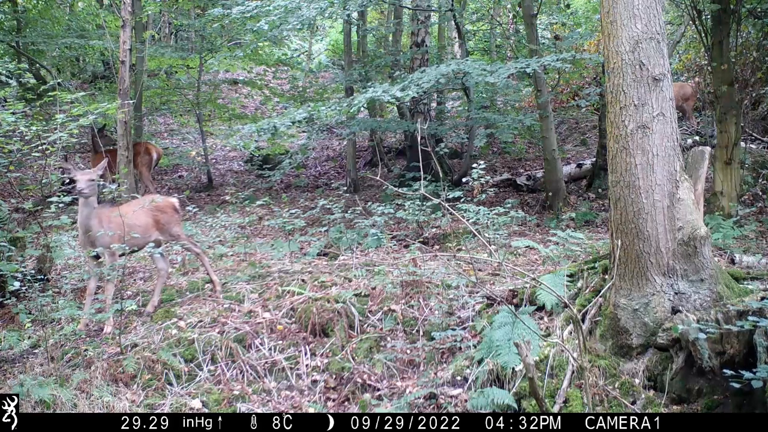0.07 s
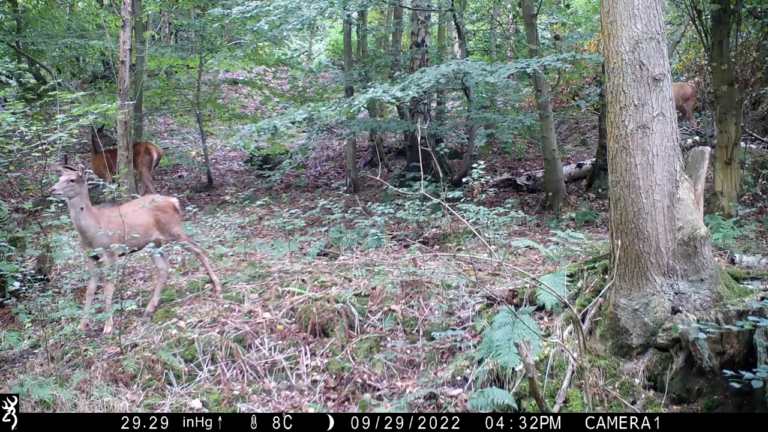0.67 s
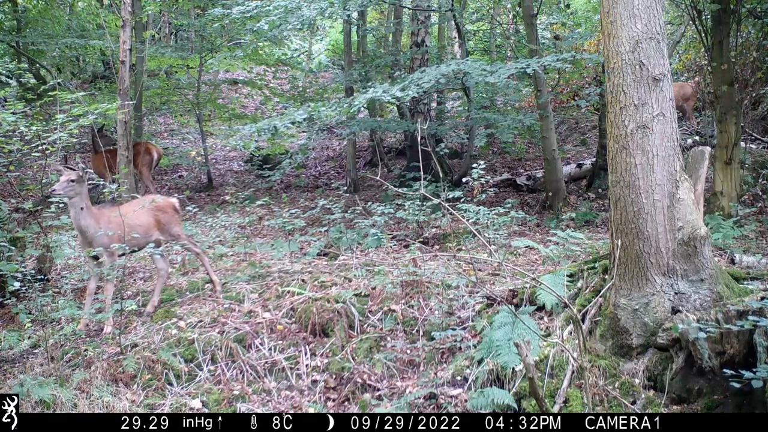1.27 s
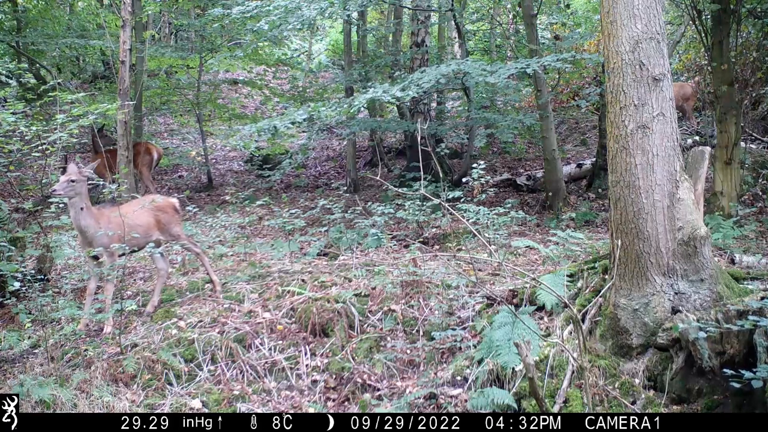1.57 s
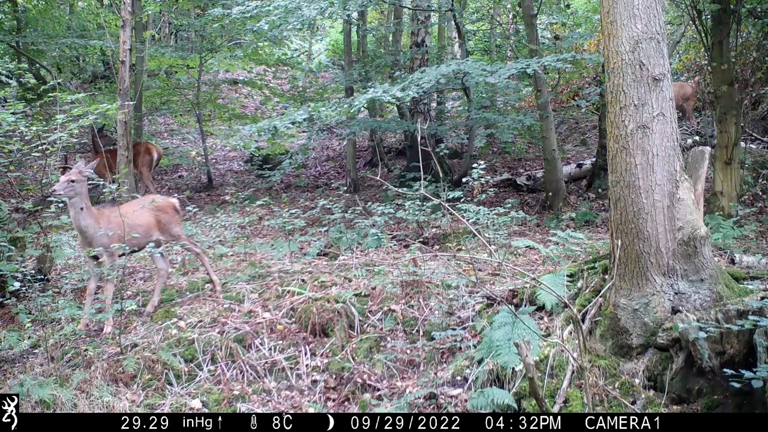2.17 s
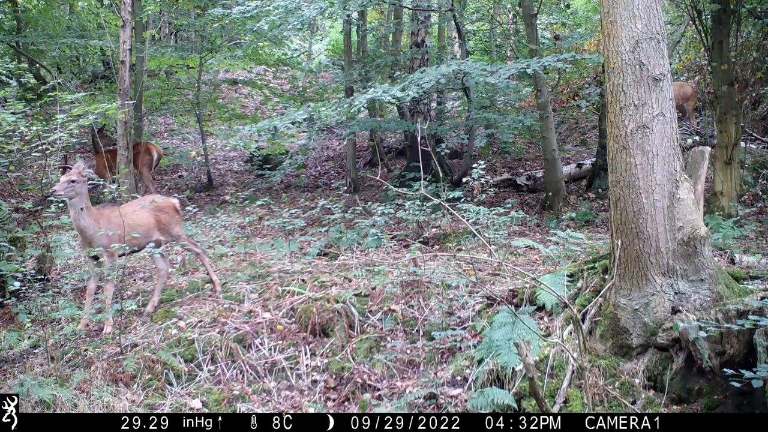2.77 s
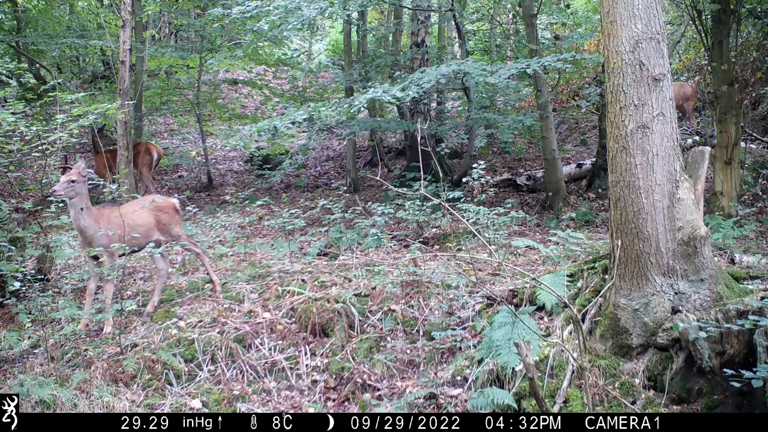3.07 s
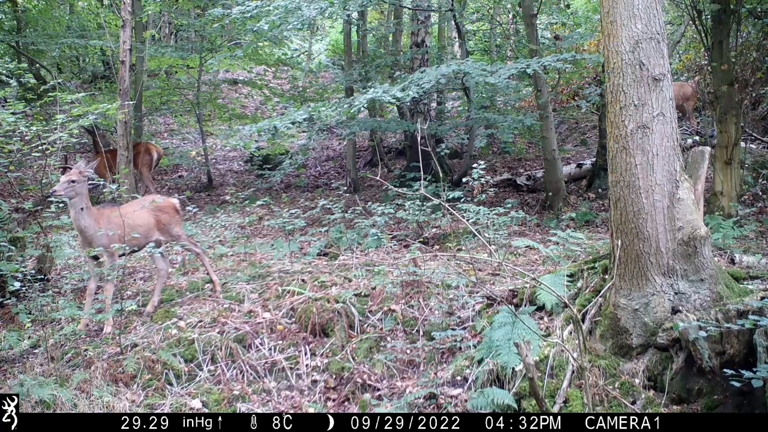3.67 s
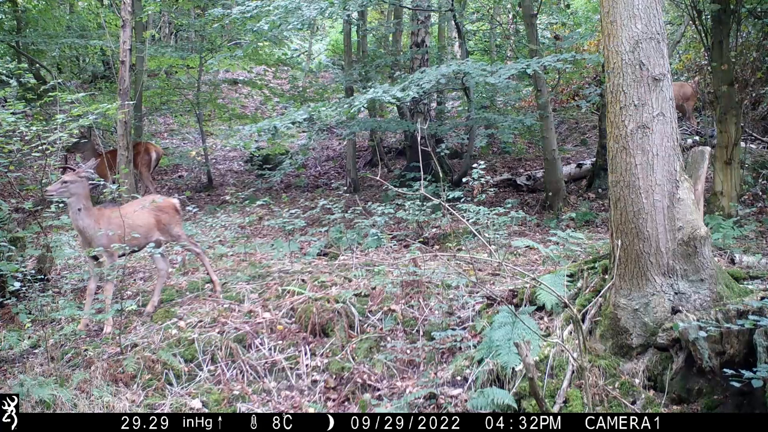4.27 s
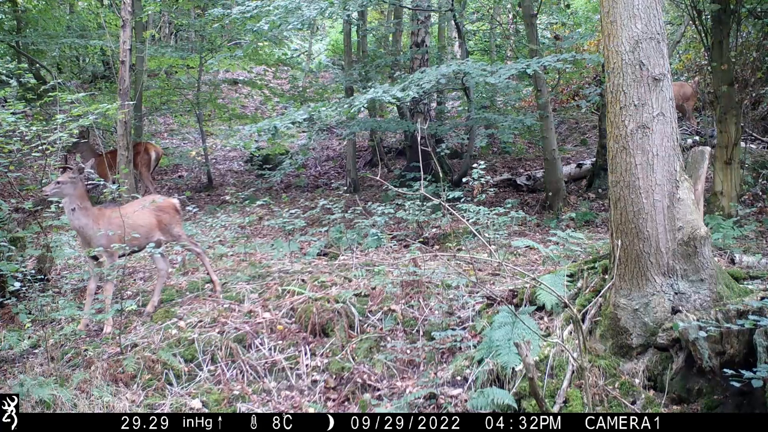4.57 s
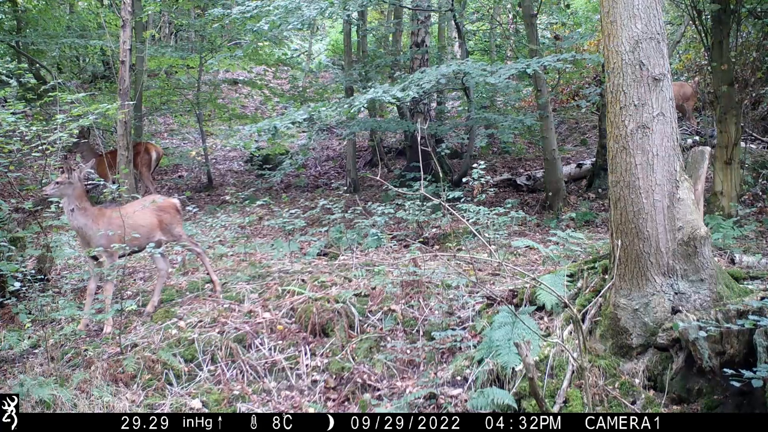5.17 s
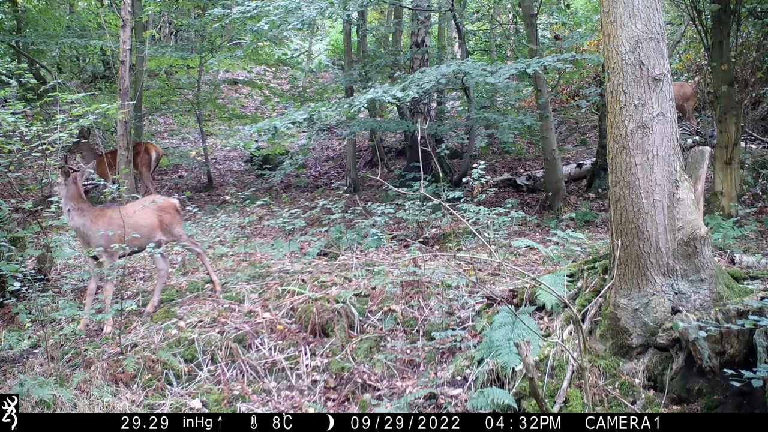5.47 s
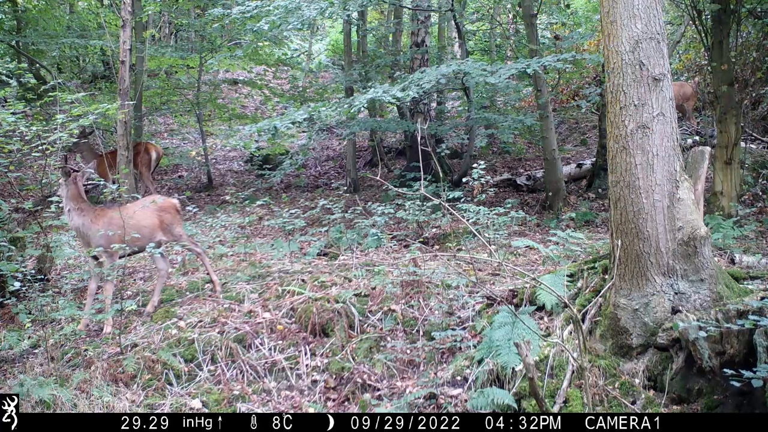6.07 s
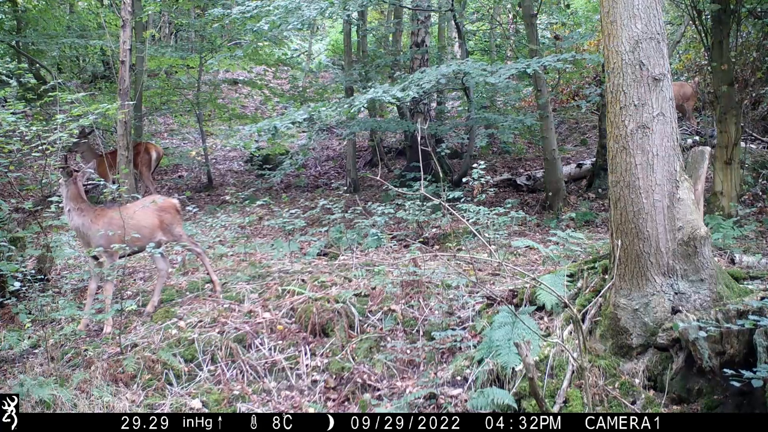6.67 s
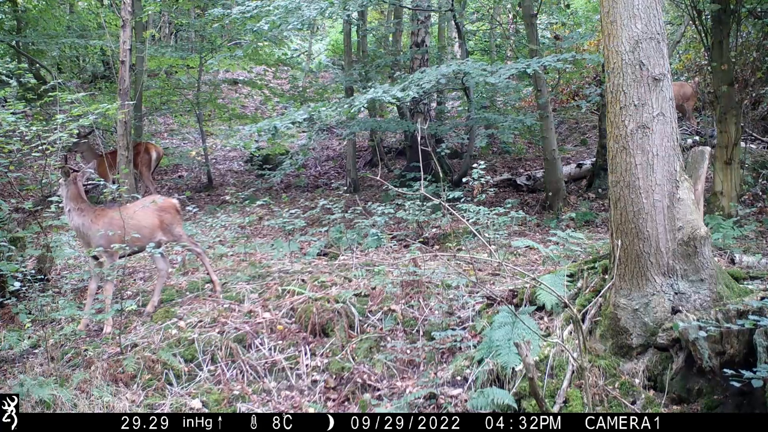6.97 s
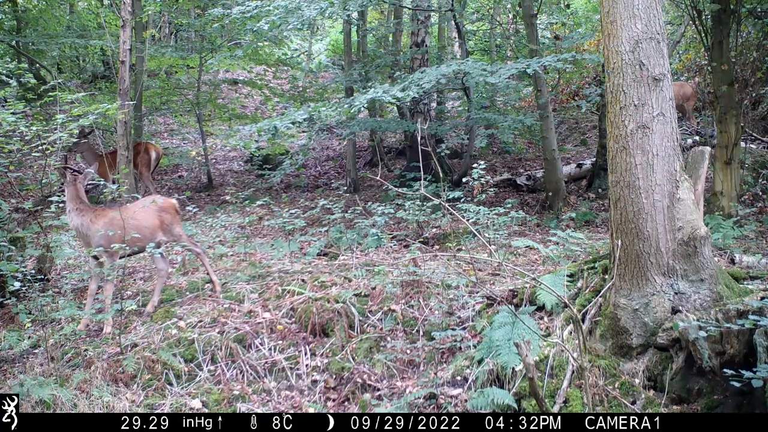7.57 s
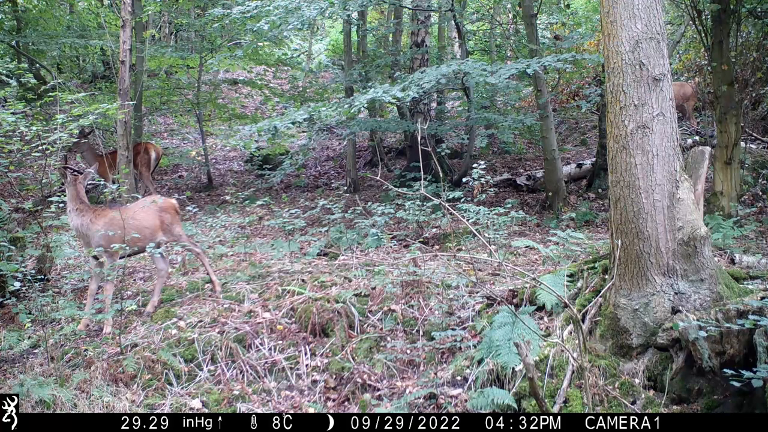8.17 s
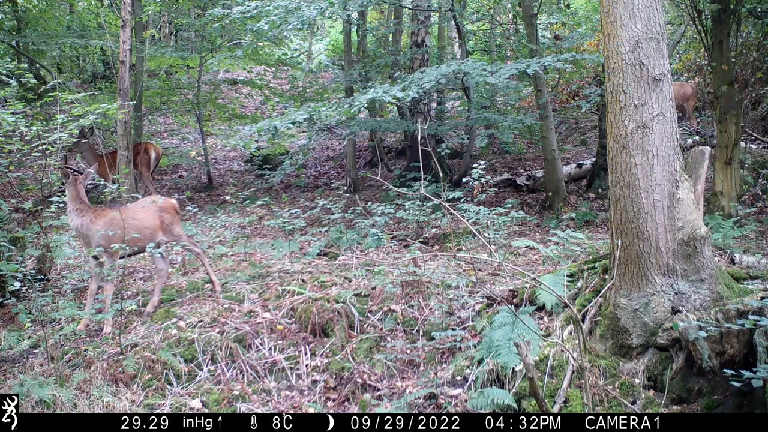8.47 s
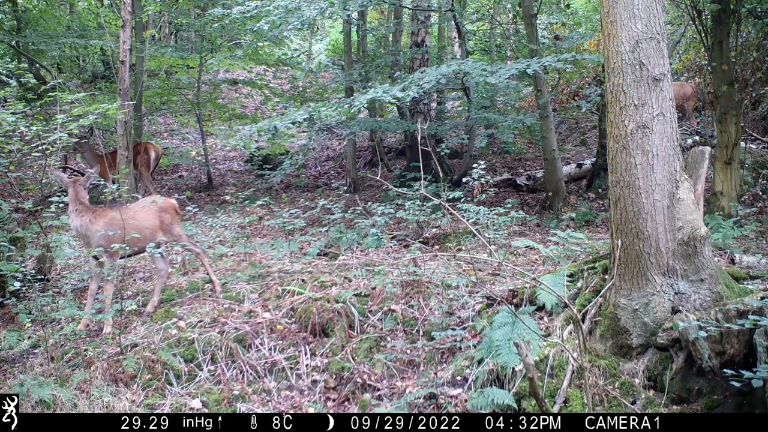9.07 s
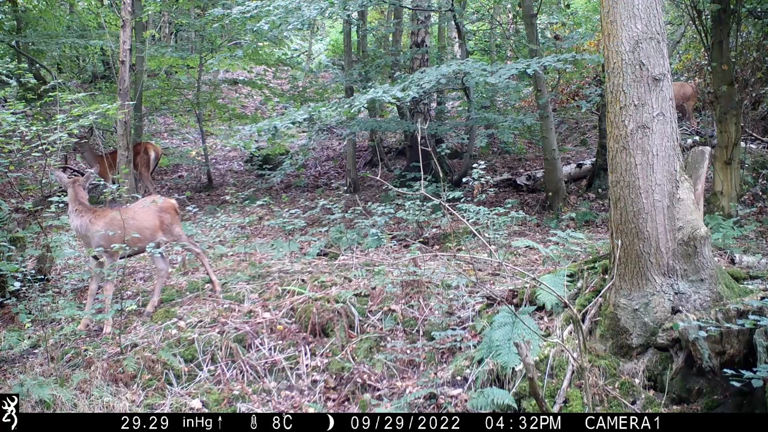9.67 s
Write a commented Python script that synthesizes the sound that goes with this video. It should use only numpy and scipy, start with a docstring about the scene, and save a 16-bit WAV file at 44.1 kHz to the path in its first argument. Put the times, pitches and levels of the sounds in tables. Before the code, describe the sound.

In a quiet wood, a few twigs snap faintly under hooves. Then a red deer stag roars loudly close by: a long bellow that climbs into a harsh rasp, holds a steadier note and sinks away. A shorter roar follows at once, swooping up from a moan into a rough rattle. The trees add a light echo, and the slightly dull microphone carries a steady soft hiss.

```python
"""In a quiet wood, a red deer stag roars twice close by, over a hiss and a soft, growing murmur.
Source and filter make the voice: the vocal folds release puffs of air and the throat resonates.
Each roar starts as a clear moan; the larynx drops, the longer throat resonates lower, and the
folds break into a harsh rattle. Twigs snap under hooves beforehand, foliage and trunks scatter
the sound, and a narrow-band microphone channel clips on the loudest stretches."""
import sys
import numpy as np
from scipy import signal
from scipy.fft import rfft, irfft, next_fast_len
from scipy.io import wavfile
from scipy.ndimage import uniform_filter1d, map_coordinates

SR = 44100
rng = np.random.default_rng(int(sys.argv[2]) if len(sys.argv) > 2 else 0)


def int16_out(signal):
    """Quantize to a 16-bit WAV file."""
    q = np.round(np.clip(np.atleast_2d(signal).T, -1, 1) * 32767)
    wavfile.write(sys.argv[1], SR, q.astype(np.int16))


N = 437913

# Spectra of the steady hiss and the midrange murmur. Each row: frequency in Hz, relative level in dB.
HISS_SPECTRUM = [(12, -35.5), (20, -6.5), (108, -1.5), (157, -5), (327, -8), (417, -11), (446, -12),
                 (476, -9), (569, -12.5), (990, -13.5), (1510, -18.5), (2870, -20), (4000, -23.5),
                 (5200, -59), (8800, -120)]
MURMUR_SPECTRUM = [(150, -36), (250, -13), (352, -6.5), (420, -5.5), (481, -7.5), (563, -3), (611, -4),
                   (1110, -1.5), (3000, -26.5), (3900, -65.5), (6600, -120)]
# The murmur grows louder and stays after the roars. Each row: time in seconds, level in dB.
MURMUR_LEVEL = [(0, -55), (2.9, -58), (6.9, -47), (9.2, -47), (9.9, -47)]
# Near and far echoes. Each row: frequency in Hz, 60 dB decay time in seconds, relative level in dB.
FOLIAGE_DECAY = [(500, 0.23, -6.5), (1200, 0.32, -9.5), (2270, 0.43, 0.5), (4100, 0.33, -7.5)]
TRUNK_DECAY = [(150, 0.34, -0.5), (410, 1.52, 8.5), (670, 0.45, -2), (1200, 1.1, -0.5), (4070, 0.49, -8.5)]
# Twigs and dry leaves under hooves. Each row: start in seconds, relative peak level in dB.
SNAPS = [(0.148, -33), (0.179, -38), (0.77, -38), (0.864, -35), (0.95, -21.5), (2.22, -30.5)]
# Resonances of a stick, then of the throat with the larynx high, halfway and dropped.
# Each row: nominal frequency in Hz, width in Hz, relative level in dB.
TWIG_MODES = [(850, 230, -4), (1460, 470, -7), (2300, 340, -17), (3160, 300, -8)]
MOAN_MODES = [(527, 22, -14), (631.5, 20, -5), (1001.6, 44, 5.5), (1407, 40, -11), (1410, 37, -13),
              (1672, 14, -10), (1980, 13, 1), (2290, 200, -18.5), (2620, 220, -21.5), (3130, 150, -32),
              (3350, 180, -14.5)]
GROAN_MODES = [(320, 40, 3), (520, 52, -10.5), (665, 180, -9), (805, 110, -13.5), (940, 290, -3.5),
               (1100, 43, -2), (1252, 56, 11), (1490, 90, -5), (1720, 40, -10), (2000, 28, -13),
               (2316, 17, -5), (2626, 76, -10), (2920, 100, -21), (3394, 270, -8)]
ROAR_MODES = [(208, 40, -4.5), (357, 28, 2), (490.8, 21, 6), (670, 90, -18.5), (837.6, 25.7, 5),
              (926, 290, -9.5), (1065, 33, 4.5), (1198, 44.3, 4), (1390, 120, -31.5), (1487, 115, -7),
              (1719, 27, -4.5), (2014, 28, -11), (2115, 93, -13), (2396, 42, -12), (2653, 130, -15),
              (3040, 75, -14.5), (3357, 75, -12), (3690, 710, -18)]
# Factor on the resonance frequencies once the throat has settled in each of those three positions.
REST_TUNING = [.96, 0.98, 1]
# Neck stretches raise the resonances, then let them sink. Each row: time in seconds, added factor.
STRETCHES = [(3.0, 0.18), (3.26, 0.14), (7.1, 0.15), (7.67, 0.039)]
# The two roars. Each row: start in seconds, end in seconds.
ROARS = [(3.0, 6.69), (7.115, 8.7)]
# Vocal effort through each roar. Each row: time in seconds, relative level in dB.
FIRST_EFFORT = [(3.0, -39), (3.04, -25.5), (3.15, -10.5), (3.2, -17.5), (3.33, -9.5), (4.08, -9.5),
                (4.16, -12.5), (4.53, -12.5), (5.18, -18), (5.24, -17), (6.11, -15), (6.19, -19),
                (6.57, -20), (6.62, -33)]
SECOND_EFFORT = [(7.11, -45.5), (7.152, -25), (7.212, -14), (7.324, -11.5), (7.356, -9), (7.438, -10),
                 (7.528, -17.5), (7.71, -10), (7.856, -12), (8.438, -15), (8.546, -22), (8.66, -41.5)]
# Pitch of the folds: the first roar climbs, arches, eases, holds and sinks; the second swoops up,
# then arches lower. Each row: time in seconds, nominal frequency in Hz.
CLIMB = [(3.02, 117), (3.124, 148.8), (3.178, 156.4), (3.236, 155.8), (3.302, 189.8), (3.35, 192.1)]
ARCH = [(3.39, 209.3), (3.552, 239.8), (4.07, 240.9), (4.298, 218.2), (4.44, 218.1)]
EASE = [(4.5, 200.3), (4.828, 191.3), (4.87, 192.2)]
HOLD = [(4.9, 169.94), (6.03, 169.94)]
SINK = [(6.06, 166.1), (6.116, 162.7), (6.412, 154.4), (6.522, 145), (6.59, 132.5)]
SWOOP = [(7.12, 109.0), (7.15, 141.9), (7.178, 159.9), (7.226, 170.8), (7.27, 171.4), (7.39, 160.9),
         (7.54, 159.2), (7.68, 165.1)]
LOW_ARCH = [(7.71, 181.8), (8.022, 197.8), (8.132, 195.6), (8.432, 167), (8.48, 167.1)]
# Brief cracks in the held note. Each row: centre in seconds, length in seconds, depth from 0 to 1.
CRACKS = [(5.242, 0.03544, 1), (5.331, .028, .9), (5.443, 0.032, .4), (5.524, .028, 0.99),
          (5.592, .026, 0.97), (5.652, 0.0471, .9), (5.941, .03, 1), (6.029, .038, .85)]
# Boundaries in Hz between the five bands of the voice: fundamental, chest, low throat, mouth, rasp.
BAND_EDGES = [280, 430, 740, 1900]
# Ways of voicing, by name. Each row: relative levels of those five bands in dB.
VOICE_BANDS = {"muffled": (-10, -11, -5, -2.5, -21), "bleat": (-27.5, -22.5, -1.5, -2.5, -16),
               "moan": (-30, -25, -6, -.5, -16.5), "groan": (-16, -11, -9, -1.5, -10.5),
               "held": (-17.5, -15.5, -2.5, -5, -15.5), "booming": (-6, -11, -15.5, -2.5, -19),
               "growl": (-4, -10.5, -13, -4.5, -19), "hoarse": (-8, -11, -9, -2.5, -15.5),
               "cracked": (-10.5, -5, -9, -1.5, -9.5), "rattle": (-8, -7, -7.5, -3.5, -17),
               "harsh": (-17.5, -9.5, -7.5, -1, -16.5)}
# Disorder of the folds. Each entry: name of the voicing, roughness from 0 to 1.
ROUGHNESS = {"muffled": .12, "bleat": .09, "moan": .03, "groan": .04, "held": .045, "booming": .055,
             "growl": .52, "hoarse": .42, "cracked": .48, "rattle": .69, "harsh": .84}
# Passages between voicings. Each row: midpoint in seconds, glide in seconds, voicing, larynx drop
# (0 high, 1 halfway, 2 or more at the breastbone), extra rasp in dB.
PHASES = [(2.99, .02, "muffled", 0.17, -5.5), (3.11, .05, "bleat", 0.056, -1),
          (3.19, .03, "muffled", 0.25, 1), (3.26, .05, "hoarse", 1.9, 2), (3.43, .07, "harsh", 2, 0),
          (4.22, .2, "harsh", 2, -2), (4.47, .08, "booming", 2, 0), (4.725, 0.044, "growl", 2, -1),
          (4.895, .04, "groan", 2, -5), (5.07, .15, "held", 2, 0), (6.12, .12, "groan", 2, -1),
          (6.28, .15, "groan", 1.46, 1), (6.535, .04, "bleat", 3, 4.5), (7.0, .02, "muffled", 0.33, 7.5),
          (7.165, .05, "bleat", 0.069, 5), (7.26, .1, "moan", 0, -2.5), (7.49, .08, "groan", 0.51, 1),
          (7.63, .1, "groan", 1.6, 2), (7.695, .03, "hoarse", 2, -0.5), (7.87, .08, "rattle", 1.8, 1),
          (8.2, .2, "rattle", 2, -4.5), (8.5, 0.053, "harsh", 2, 1)]
# Response of the microphone channel. Each row: frequency in Hz, gain in dB.
MICROPHONE = [(3700, -0.5), (4000, -11), (4250, -2), (4420, -11), (4620, -52.5), (4900, -100)]


def amp(db):
    """Amplitude ratio of a level in decibels."""
    return 10 ** (np.asarray(db) / 20)


def unit(x):
    """Normalisation to an rms of 1."""
    return x / np.sqrt(np.mean(x ** 2) + 1e-20)


def curves(rows, t):
    """Linear interpolation of each later column against the first."""
    knots, *columns = np.transpose(rows)
    return [np.interp(t, knots, column) for column in columns]


def wobble(rate):
    """Smooth random fluctuation: a spline through rate knots a second."""
    knots = rng.standard_normal(int(N * rate / SR) + 4)
    return map_coordinates(knots, [np.arange(N) * rate / SR])


def filtered(x, response):
    """Linear filtering: the spectrum is multiplied by a function of frequency."""
    size = next_fast_len(N + SR // 4, real=True)
    return irfft(rfft(x, size) * response(np.fft.rfftfreq(size, 1 / SR)), size)[..., :N]


def shaped(x, spectrum):
    """Spectral shaping by (Hz, dB) points joined on a logarithmic frequency axis."""
    knots, db = np.transpose(spectrum)
    return filtered(x, lambda hz: amp(np.interp(np.log(hz + 1), np.log(knots), db)))


def resonances(modes, hz, skirt=1.83):
    """Resonance peaks add in power; skirt sets how steeply their flanks fall."""
    return np.sqrt(sum(amp(db) ** 2 / (1 + (2 * (hz - centre) / width) ** 2 / skirt) ** skirt
                       for centre, width, db in modes))


def minimum_phase(gain):
    """Causality: a response with this gain (frequency on axis 0) that rings only once struck."""
    cepstrum = irfft(np.log(gain + 1e-6), axis=0)
    half = len(cepstrum) // 2
    cepstrum[1:half] *= 2
    cepstrum[half + 1:] = 0
    return np.exp(rfft(cepstrum, axis=0))


def background_noise(t, hiss_db=-45.5):
    """Coloured noise: a steady hiss and rumble, and a soft midrange murmur that grows and stays."""
    hiss = unit(shaped(rng.standard_normal(N), HISS_SPECTRUM))
    murmur = unit(shaped(rng.standard_normal(N), MURMUR_SPECTRUM))
    murmur_db, = curves(MURMUR_LEVEL, t)
    return amp(hiss_db) * hiss + amp(murmur_db) * murmur


def tree_echoes(x, decay, build_s):
    """Multiple scattering: diffuse echoes build up, then each band decays at its own rate."""
    hz, t, noise = signal.stft(rng.standard_normal(SR * 3 // 2), SR, nperseg=256)
    t60, db = curves(decay, hz[:, None])
    envelope = amp(db - 60 * t / t60) * (1 - np.exp(-t / build_s))
    tail = signal.istft(noise * envelope, SR, nperseg=256)[1]
    return signal.fftconvolve(x, tail / np.linalg.norm(tail))[:N]


def twigs(t60_s=0.051, gain_db=-2):
    """Impulsive excitation: a short burst of splintering rings the modes of a stick."""
    out, t = np.zeros(N), np.arange(4096) / SR
    stick = minimum_phase(resonances(TWIG_MODES, np.fft.rfftfreq(len(t), 1 / SR), skirt=1))
    for start, db in SNAPS:
        burst = rng.standard_normal(len(t)) * amp(-60 * t / t60_s)
        snap = irfft(rfft(burst) * stick)
        out[round(start * SR):][:len(t)] += amp(db + gain_db) * snap / abs(snap).max()
    return out


def glided(t, values):
    """Continuous articulation: one value for each phase, joined by linear glides."""
    out = np.full(len(t), float(values[0]))
    for (midpoint, glide, *_), before, after in zip(PHASES[1:], values, values[1:]):
        out += (after - before) * np.clip((t - midpoint) / glide + .5, 0, 1)
    return out


def throat_tuning(t, drop, rise_s=0.025, sink_s=0.17):
    """Resonance varies inversely with tube length: this factor jumps, then sinks at each stretch."""
    tuning = np.interp(drop, range(3), REST_TUNING)
    for start, lift in STRETCHES:
        rise = np.clip((t - start) / rise_s + 1, 0, 1)
        tuning += lift * rise * np.exp(-np.maximum(t - start, 0) / sink_s)
    return tuning


def articulation(t, crack_jump_hz=5, slack_below_db=-24, chest_tuned_hz=160):
    """Slow modulation of source and filter: the state of the folds, larynx and band levels."""
    slow = t[::64]
    _, _, voicings, drops, rasps = zip(*PHASES)
    crack = sum(depth * np.clip(2 - 2.5 * abs(slow - centre) / length, 0, 1)
                for centre, length, depth in CRACKS)
    crack = np.clip(crack, 0, 1)

    def voiced(value_of):
        """Crossfade of one property between the current voicing and the cracked one."""
        current = glided(slow, [value_of(name) for name in voicings])
        return (1 - crack) * current + crack * value_of("cracked")

    effort, = curves([*FIRST_EFFORT, *SECOND_EFFORT], slow)
    pitch, = curves([*CLIMB, *ARCH, *EASE, *HOLD, *SINK, *SWOOP, *LOW_ARCH], slow)
    pitch += crack_jump_hz * crack
    slack = 0.05 * np.maximum(slack_below_db - effort, 0)  # at low effort the folds flap
    rough = np.clip(voiced(ROUGHNESS.get) + slack, 0, 1)
    doubling = .2 * voiced(lambda name: name in ("booming", "growl"))
    drop = np.clip(glided(slow, drops), 0, 2)
    tuning = throat_tuning(slow, drop)
    band_db = [voiced(lambda name: VOICE_BANDS[name][k]) for k in range(len(BAND_EDGES) + 1)]
    # below the chest's resonance the fundamental loses 1.4 dB per Hz, 11 dB at most
    band_db[0] -= np.clip(1.4 * (chest_tuned_hz - pitch), 0, 11)
    band_db[-1] += glided(slow, rasps)
    return [np.interp(t, slow, c) for c in (effort, pitch, rough, doubling, drop, tuning, *band_db)]


def whistle(t, start_s=3.225, end_s=4.48, from_hz=974, to_hz=835.6, slide_s=.22, fade_s=.09):
    """An unsteady tone rides one throat resonance, sliding down and fading as the neck stretches."""
    age = np.maximum(t - start_s, 0)
    hz = to_hz + (from_hz - to_hz) * np.exp(-age / slide_s)
    wander_hz = 12 * unit(uniform_filter1d(rng.standard_normal(N), size=400))
    db = -24 + 21 * np.exp(-age / fade_s)
    gate = np.clip(np.minimum(age, end_s - t) / .025, 0, 1)
    return amp(db) * gate * unit(np.sin(2 * np.pi * np.cumsum(hz + wander_hz) / SR))


def vocal_folds(pitch, rough, doubling, jitter=0.1997, shimmer_db=4, leak=0.013, flow_db=-14):
    """The glottal source: one puff a cycle; roughness scatters times and sizes and adds turbulence."""
    chaos = rough ** 1.5
    waver = 1 + .0022 * wobble(70) + .003034 * wobble(11)
    cycles = np.cumsum(pitch * waver) / SR
    closures = np.flatnonzero(np.diff(np.floor(cycles))) + 1
    period = SR / pitch[closures]
    late, strong = rng.standard_normal((len(closures), 2)).T
    shift = jitter * chaos[closures] * late - cycles[closures] % 1
    place = np.clip(closures + shift * period, 0, N - 2)
    alternation = 1 + doubling[closures] * (-1) ** np.arange(len(closures))  # period doubling
    size = amp(shimmer_db * rough[closures] * strong) * alternation * np.sqrt(period)
    whole, part = place.astype(int), place % 1  # each puff is shared between two samples
    puffs = np.bincount(whole, size * (1 - part), N) + np.bincount(whole + 1, size * part, N)
    swing = np.cos(2 * np.pi * cycles)
    turbulence = (leak + 0.99 * chaos) * unit(rng.standard_normal(N) * (1 + swing) ** 2)
    # the swing of the airflow keeps a clean fundamental until the folds are fully chaotic
    fundamental = amp(flow_db) * (1 - rough ** 2) * swing
    return puffs + turbulence + fundamental


def throat(source, drop, tuning, rough, chest_hz=190, notch_hz=1920, low_hz=135, high_hz=3850):
    """The vocal tract filter: resonances sink with the larynx; the chest and one notch stay put."""
    bins, t, spectra = signal.stft(source, SR, nperseg=2048, noverlap=1536)
    drop, tuning, rough = (np.interp(t * SR, np.arange(N), c) for c in (drop, tuning, rough))
    hz = bins[:, None]
    gain = resonances([(chest_hz, 80, -7)], hz)
    for position, modes in enumerate((MOAN_MODES, GROAN_MODES, ROAR_MODES)):
        share = np.maximum(1 - abs(drop - position), 0)
        gain = gain + share * np.interp(hz / tuning, bins, resonances(modes, bins))
    gain /= np.sqrt(1 + (hz / high_hz) ** 40)
    # a fizz near 4 kHz on the harsh, loud stretches
    gain += rough ** 2 * resonances([(4000, 500, -23)], hz)
    gain *= amp(-14 * np.exp(-((hz - notch_hz) / 80) ** 2))
    gain /= np.sqrt(1 + (low_hz / (hz + 1)) ** 8)
    return signal.istft(spectra * minimum_phase(gain), SR, nperseg=2048, noverlap=1536)[1][:N]


def stag(t, gain_db=-1, attack_s=.02, release_s=.12, rattle_db=1.2, surge_db=0.86):
    """Source-filter voice: effort sets its level, voicing its five bands, roughness its flutter."""
    effort, pitch, rough, doubling, drop, tuning, *band_db = articulation(t)
    source = vocal_folds(pitch, rough, doubling) + whistle(t)
    voice = throat(source, drop, tuning, rough)
    below = [filtered(voice, lambda hz: 1 / (1 + (hz / edge) ** 24)) for edge in BAND_EDGES]
    bands = np.diff([np.zeros(N), *below, voice], axis=0)
    window = int(.04 * SR)
    balanced = np.zeros(N)
    for band, db in zip(bands, band_db):  # each band is levelled, then given its own strength
        power = uniform_filter1d(uniform_filter1d(band ** 2, window), window)
        balanced += amp(db) * band / np.sqrt(abs(power) + 1e-12)
    gate = sum(np.clip(np.minimum((t - start) / attack_s, (end - t) / release_s), 0, 1)
               for start, end in ROARS)
    flutter_db = rough * (rattle_db * wobble(rate=55) + surge_db * wobble(rate=18))
    return balanced * gate * amp(effort + gain_db + flutter_db)


def scene(near_db=-6, roar_echo_db=-20, twig_echo_db=-8):
    """Superposition of the direct sound, its near and far echoes and the background."""
    t = np.arange(N) / SR
    roars, snaps = stag(t), twigs()
    near = amp(near_db) * tree_echoes(roars + snaps, FOLIAGE_DECAY, build_s=.003)
    far = tree_echoes(amp(roar_echo_db) * roars + amp(twig_echo_db) * snaps, TRUNK_DECAY, build_s=.02)
    return (roars + snaps + near + far + background_noise(t))[None]


def record(dry, drive_db=0.21, soft_limit=0.76, hard_limit=.71, top_hz=15870):
    """Saturation: a preamplifier rounds the peaks, the band narrows, overshoots clip and spit treble."""
    driven = amp(drive_db) * dry
    rounded = driven / (1 + (driven / soft_limit) ** 12) ** (1 / 12)
    narrow = shaped(rounded, MICROPHONE)
    clipped = np.clip(narrow, -hard_limit, hard_limit)
    return filtered(clipped, lambda hz: hz < top_hz)


dry = scene()
out = record(dry)
int16_out(out)
```